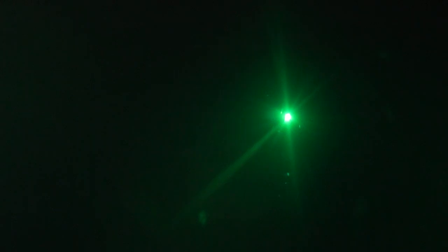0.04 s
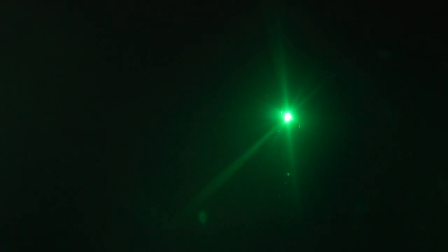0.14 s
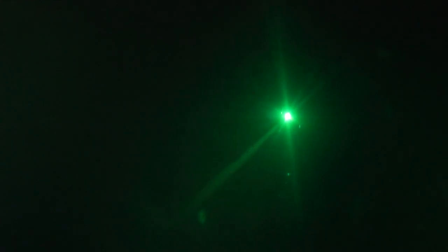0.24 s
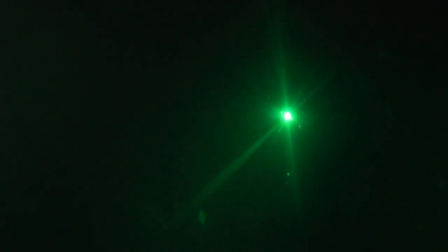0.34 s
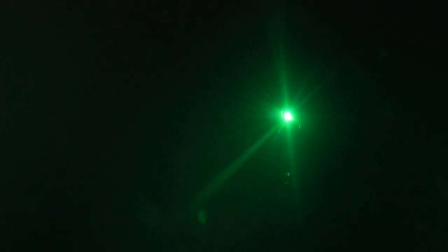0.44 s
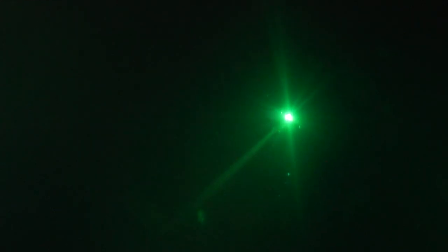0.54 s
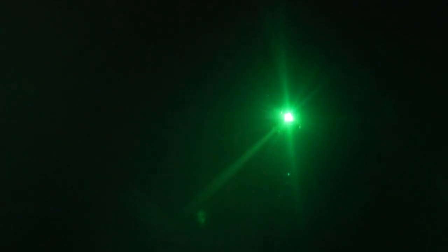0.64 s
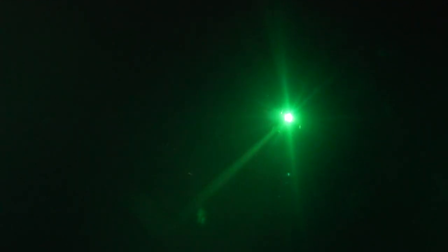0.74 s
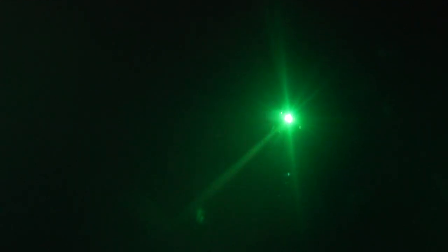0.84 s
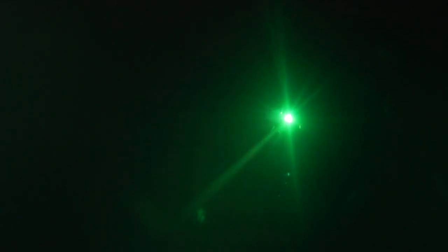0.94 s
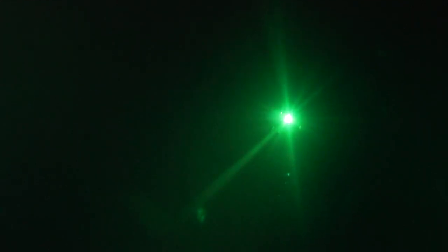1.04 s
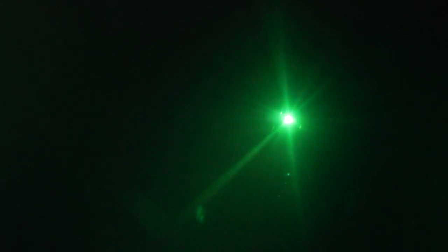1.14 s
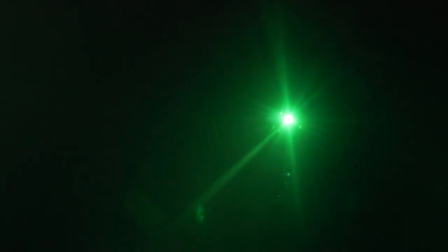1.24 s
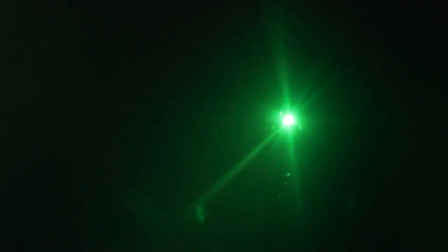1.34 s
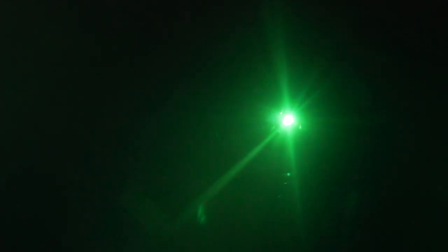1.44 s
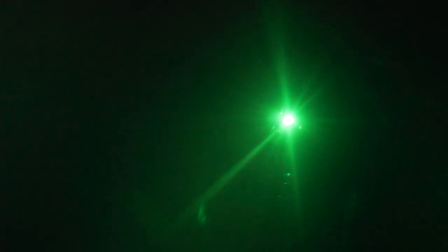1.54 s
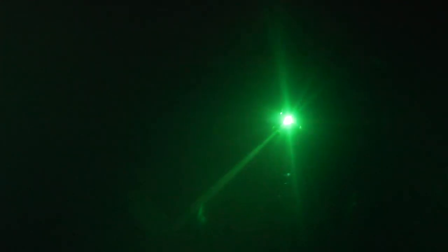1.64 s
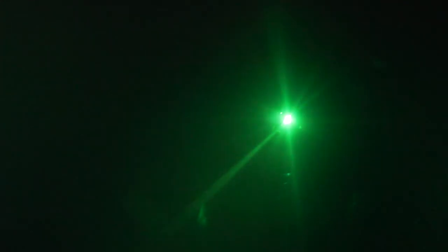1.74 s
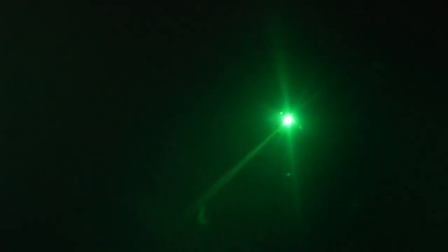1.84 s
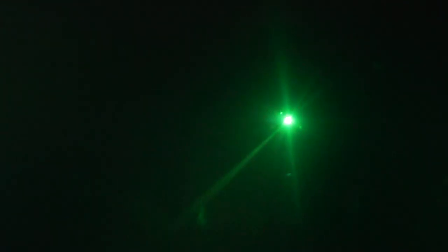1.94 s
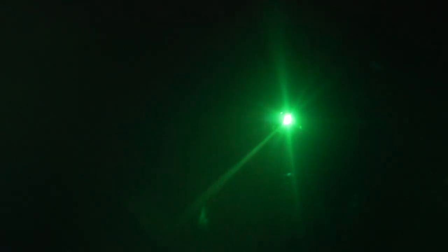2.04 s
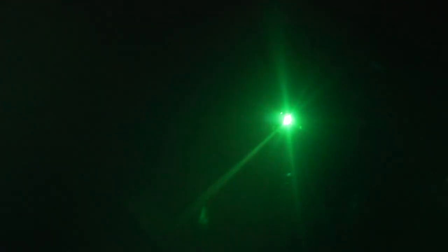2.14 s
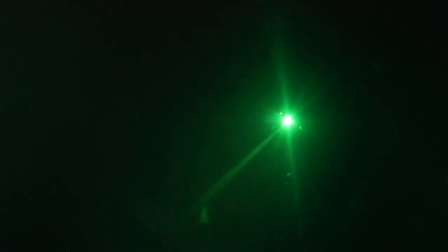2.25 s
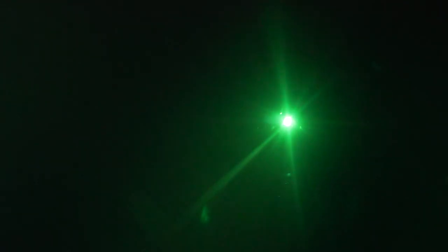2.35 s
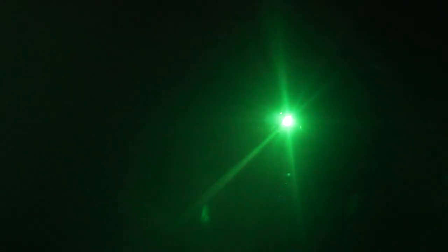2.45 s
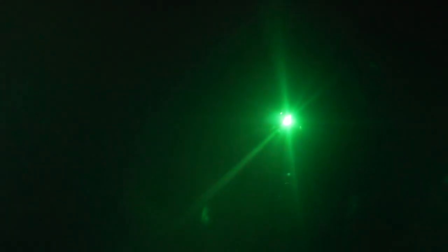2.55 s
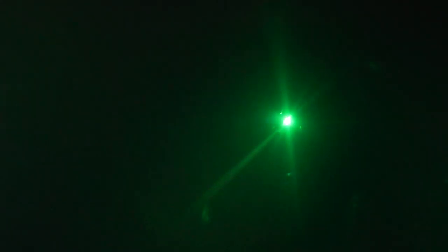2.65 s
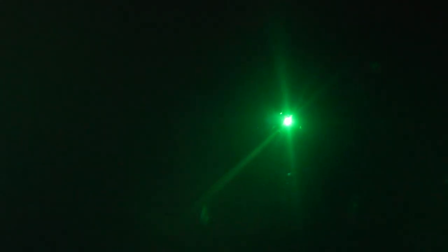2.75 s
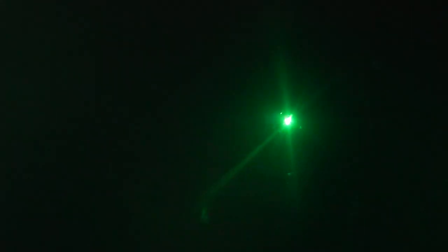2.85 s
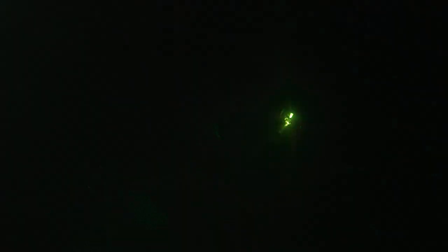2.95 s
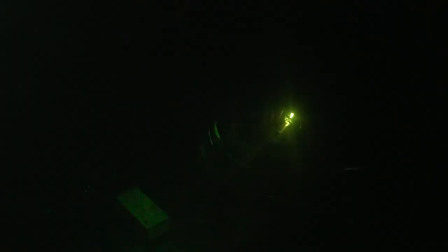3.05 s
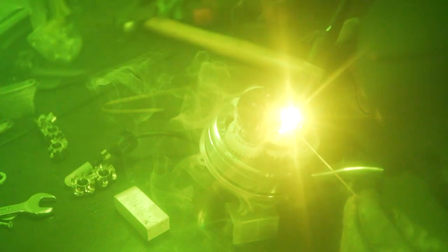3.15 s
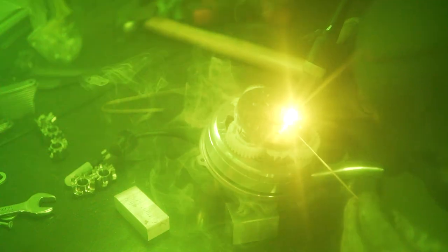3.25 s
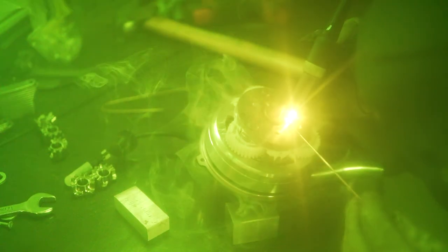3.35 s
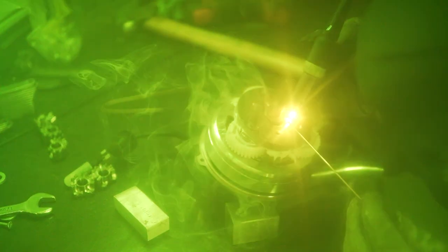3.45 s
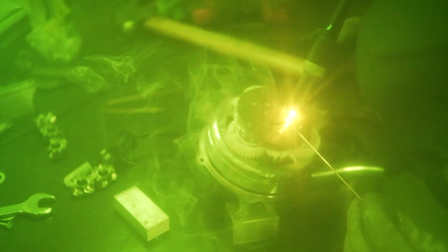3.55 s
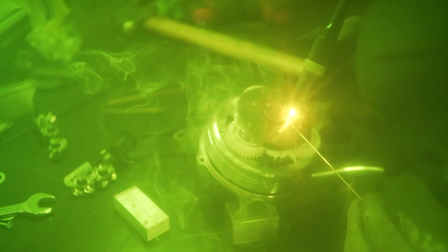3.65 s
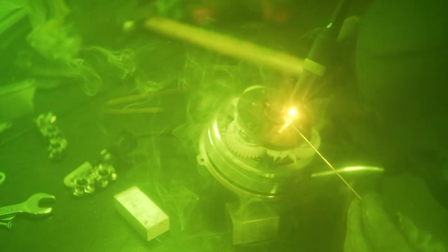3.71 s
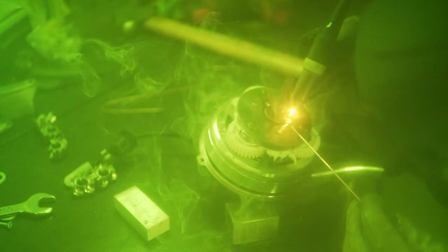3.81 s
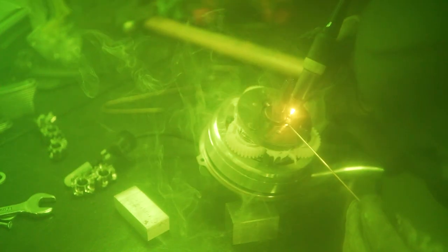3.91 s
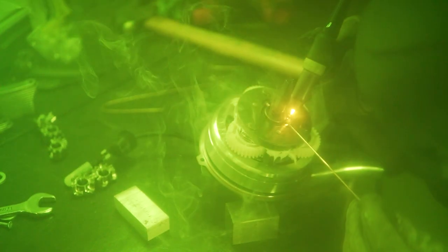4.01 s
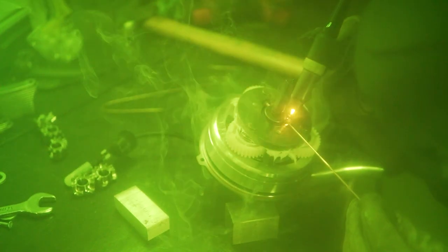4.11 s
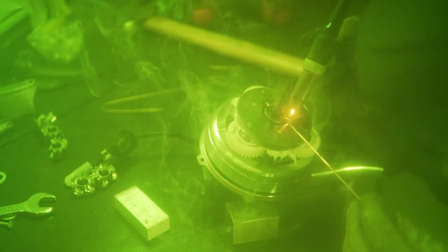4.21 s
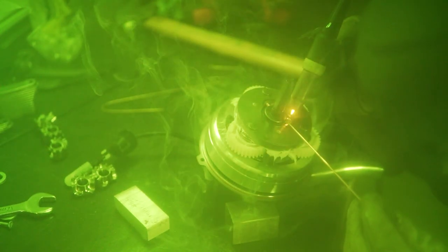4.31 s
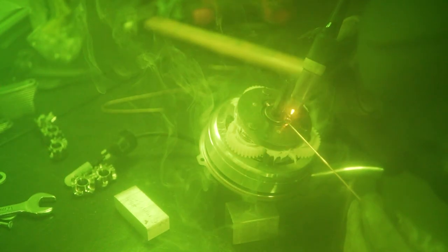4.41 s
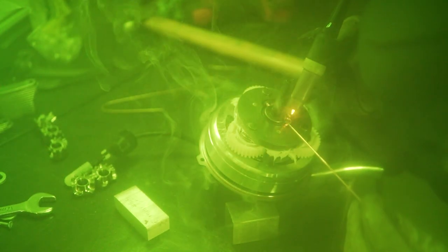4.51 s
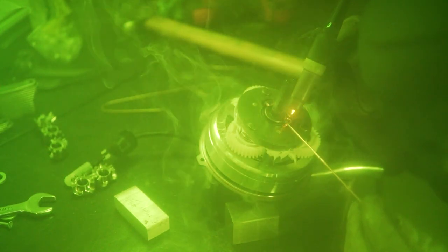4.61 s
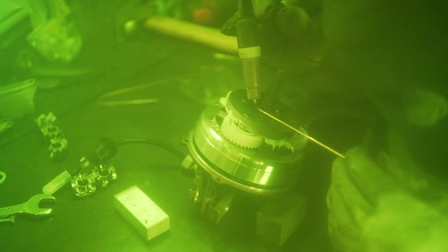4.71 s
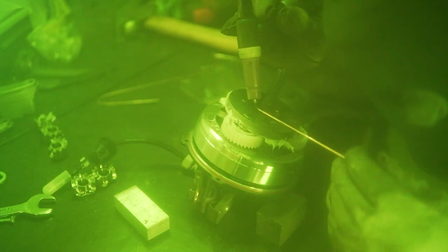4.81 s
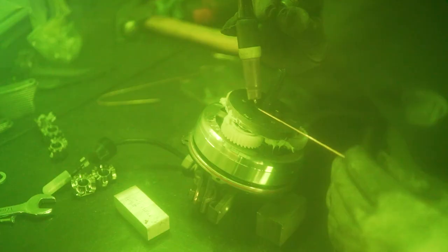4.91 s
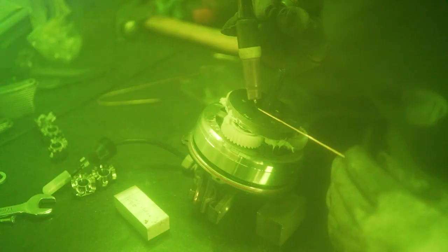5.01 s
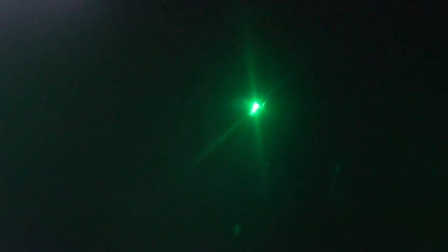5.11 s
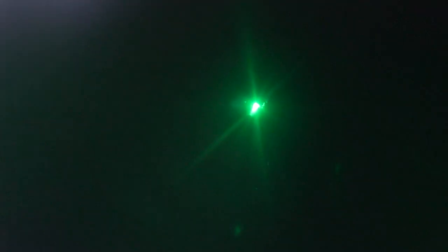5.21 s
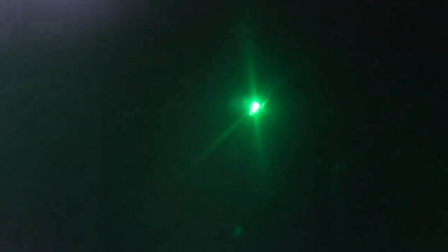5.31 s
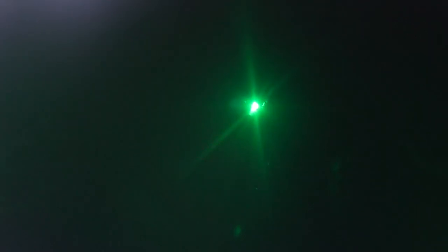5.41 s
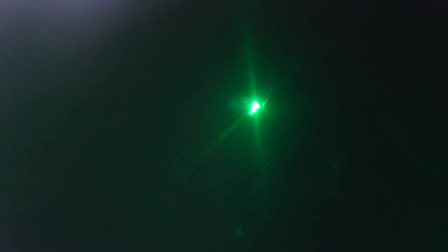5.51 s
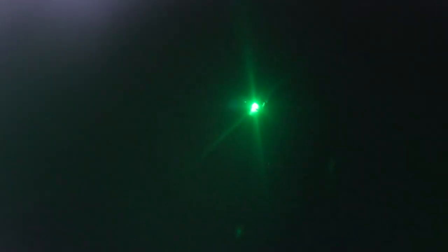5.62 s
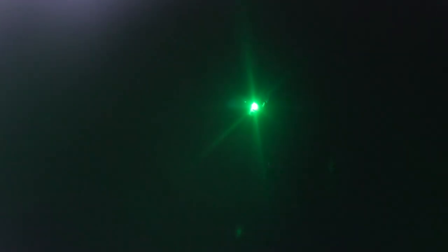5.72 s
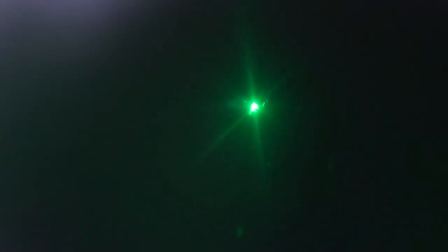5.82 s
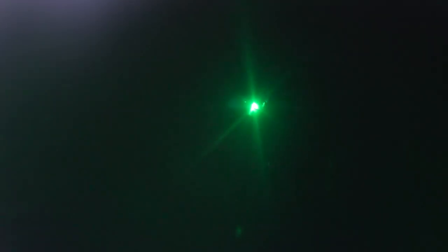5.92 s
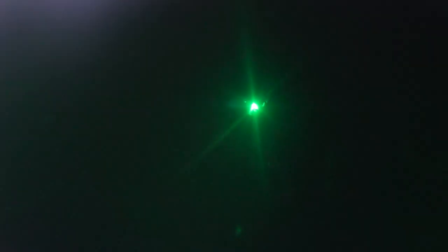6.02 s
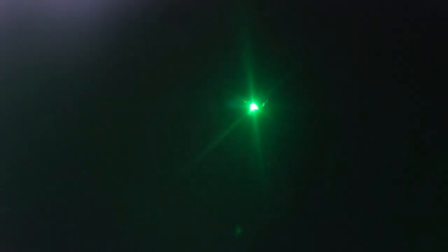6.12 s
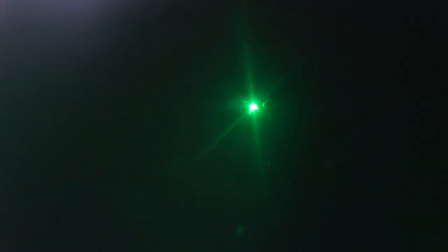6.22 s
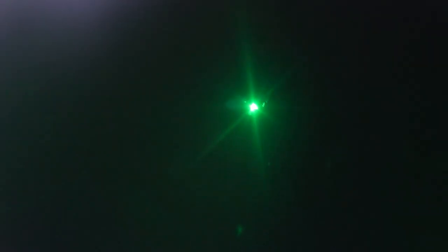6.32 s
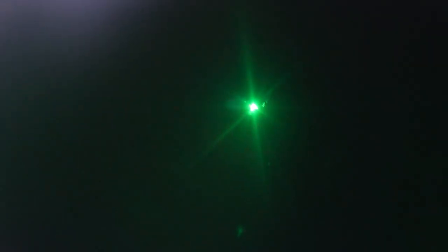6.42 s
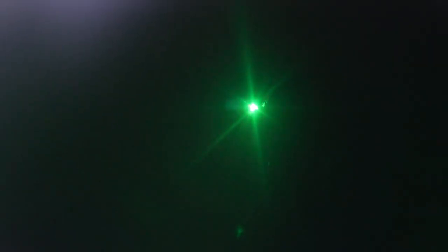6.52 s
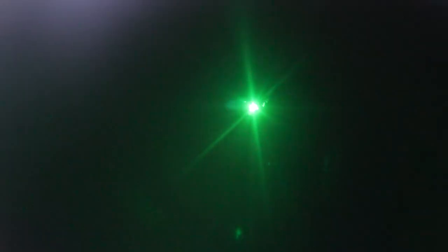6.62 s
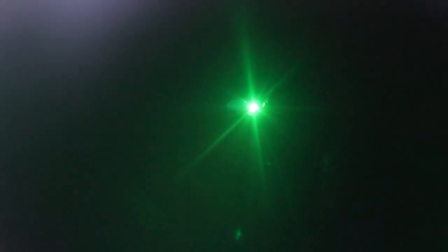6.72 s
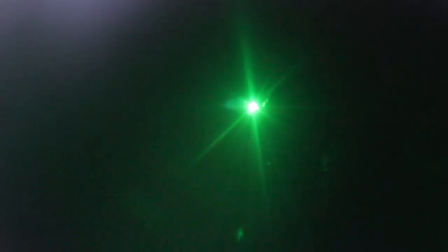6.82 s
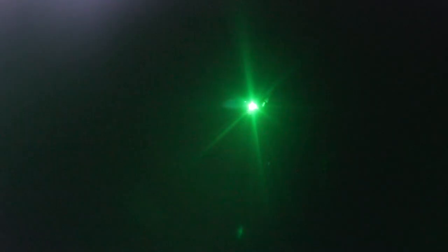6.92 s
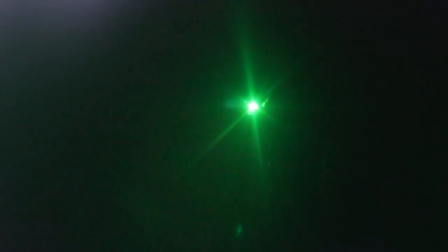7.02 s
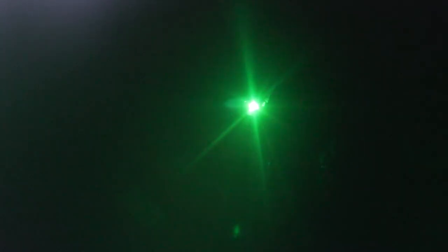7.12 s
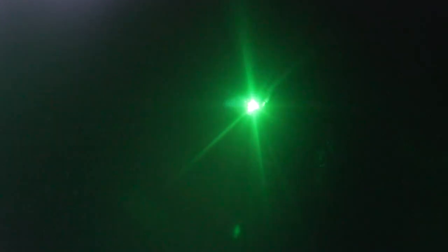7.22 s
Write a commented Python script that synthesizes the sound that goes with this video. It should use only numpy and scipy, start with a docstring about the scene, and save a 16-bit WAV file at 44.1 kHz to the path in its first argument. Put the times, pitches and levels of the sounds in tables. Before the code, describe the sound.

Close arc welding crackles and hisses, stops with a hollow pop, then snaps back on over a quiet machine hum.

```python
"""An AC TIG torch welds a small metal part on a workshop bench, close to a single microphone.
The arc hisses, roars and cracks unevenly as it relights on its 100 Hz current cycle; the first of
two runs ends with a hollow pop. Shielding gas keeps flowing while the torch is reset, with light
knocks and ticks of the filler rod, and a loud spark starts the second run. Behind it all the
machine hums and its cooling fan runs."""
import sys
import numpy as np
from scipy import signal
from scipy.fft import rfft, irfft
from scipy.io import wavfile

SR = 44100
rng = np.random.default_rng(int(sys.argv[2]) if len(sys.argv) > 2 else 0)


def materialize(psi):
    """Save the field psi as 16-bit PCM at rate SR to the path in sys.argv[1].

    A 1-D psi becomes a single channel; in a 2-D psi each row is a channel.
    """
    bounded = np.clip(np.atleast_2d(psi).T, -1, 1)
    quanta = np.round(bounded * 32767).astype(np.int16)
    wavfile.write(sys.argv[1], SR, quanta)


N = 320166
TIME = np.arange(N) / SR
ARC_OUT_S, TORCH_MOVED_S, ARC_ON_S = 2.968, 4.738, 5.125


def arc_cracks(run, start_s, stop_s, relight_s, gain_db, stray_db, spread_db):
    """The arc relights relight_s into each cycle: mostly softly, with stray cracks and loud bursts."""
    # bursts of loud cracks: start_s, length_cycles, cracks_before_one_soft_cycle, relative_db
    bursts = [(.22, 5, 1, -15), (.31, 4, 2, -13), (.43, 2, 2, -15), (.79, 2, 2, -15), (.89, 4, 4, -15),
              (1.09, 5, 1, -15), (1.18, 2, 2, -15), (1.25, 3, 1, -14), (1.32, 2, 2, -15), (1.46, 2, 2, -15),
              (1.51, 2, 2, -13), (1.56, 2, 2, -14), (1.78, 2, 2, -14), (1.84, 5, 2, -14), (1.96, 2, 2, -16),
              (2.03, 1, 1, -15), (2.14, 3, 3, -14.5), (2.19, 5, 1, -14), (2.42, 2, 2, -15),
              (2.59, 2, 2, -13), (2.74, 8, 6, -16), (2.85, 12, 12, -11), (5.22, 3, 3, -14),
              (5.31, 5, 2, -15), (5.43, 5, 2, -15), (5.54, 3, 1, -13), (5.61, 2, 2, -16), (5.74, 9, 7, -13),
              (5.9, 2, 2, -14), (6.0, 5, 2, -14), (6.09, 1, 1, -12), (6.17, 9, 2, -13), (6.28, 2, 2, -12),
              (6.41, 5, 2, -14), (6.49, 11, 6, -13), (6.61, 7, 2, -15), (6.71, 4, 4, -13),
              (6.82, 1, 1, -13), (6.86, 7, 2, -14), (6.95, 3, 1, -12), (7.22, 3, 3, -14)]
    # spectrum of a crack for each torch position: frequency_hz, relative_db
    crack_1 = [(250, -9), (700, -8.5), (1500, -15.5), (2000, -4.5), (2650, -11.5), (3300, 2), (5500, -7),
               (7500, 3), (9000, -6), (11000, -18), (15500, -32)]
    crack_2 = [(250, -17.5), (700, -3), (1500, -26), (3300, -5.5), (5500, -8), (7500, 3), (9000, -15),
               (11000, -24.5), (15500, -51)]
    # its echoes off the gas cup and the part: delay_ms, gain
    echoes_1 = [(.166, .5), (.994, -.37), (1.094, .28)]
    echoes_2 = [(.3, -.9), (.542, .7), (.673, -.8), (.95, .3)]
    spectrum, echoes = (crack_1, echoes_1) if run == 1 else (crack_2, echoes_2)
    cycle_hz, polarity_lag_s, jitter_s = 100, .0003, .0001
    cycle = np.arange(int(TIME[-1] * cycle_hz))
    crack_db = stray_db - spread_db * rng.random(len(cycle))
    scatter_db = 1.03 * rng.standard_normal(len(cycle))
    for burst_s, length, in_a_row, burst_db in bursts:
        step = cycle - round(burst_s * cycle_hz)
        calm = (step >= -1) & (step <= length)   # just before, between and after the loud cracks
        loud = (step >= 0) & (step < length) & (step % (in_a_row + 1) < in_a_row)
        opening_db = 1.0 * (step == 0)   # a burst opens a little harder
        crack_db[calm] = stray_db - spread_db / 2
        crack_db[loud] = (burst_db + scatter_db + opening_db)[loud]
    at_s = cycle / cycle_hz + relight_s + polarity_lag_s * (cycle % 2)
    at_s += jitter_s * rng.standard_normal(len(cycle))
    lit = (at_s > start_s) & (at_s < stop_s)
    clicks = np.zeros(N)
    clicks[(at_s[lit] * SR).astype(int)] = from_db(crack_db[lit])
    # each spark sputters for about a millisecond
    sputter = .04 * np.convolve(clicks, np.ones(SR // 900))[:N] * rng.standard_normal(N)
    spark = smear(colour(sputter - clicks, spectrum), lag_ms=.3, feedback=.55)
    reflected = sum(gain * np.roll(spark, round(ms * SR / 1000)) for ms, gain in echoes)
    return from_db(gain_db) * (spark + reflected)


def arc_burn(run, hiss_db, sing_db, roar_db, flutter_db):
    """The hot gas hisses, sings in narrow resonances and roars low; all of it flutters with the arc."""
    # strength of the arc through each run: time_s, hiss_relative_db, roar_relative_db
    curve_1 = [(0.0, -31.5, -37.5), (2.86, -30.5, -35), (2.93, -28, -27)]
    curve_2 = [(5.2, -28, -29.5), (5.35, -31.5, -36), (7.26, -30, -37)]
    # hiss of the burning arc in each run: frequency_hz, relative_db
    hiss_1 = [(700, -32), (1420, -10), (2330, -13), (3360, -0.5), (3880, -9.5), (4290, 4.5), (4740, -36),
              (5430, -0.5), (6070, -8), (7360, 4), (9560, -14), (11240, -27), (11600, -18), (15460, -40)]
    hiss_2 = [(700, -28), (1420, -20), (2450, -17), (2710, 1.5), (3230, -6), (3750, 4), (4650, -36),
              (5430, 5.5), (6070, -1), (7880, 4.5), (8660, -0.5), (13950, -34), (14470, -48), (15460, -63)]
    # resonances that sing in the hiss: pitch_hz, width_hz, relative_db
    sing_1 = [(3280, 220, -4.5), (5310, 190, -1), (6300, 140, -2), (7350, 62, 4), (7720, 48, 2),
              (8400, 80, -3), (9120, 80, -10), (9830, 120, -13), (11600, 180, -17), (12700, 80, -24)]
    sing_2 = [(2045, 96, -1.5), (4190, 140, 4.5), (5720, 440, 1.5), (6800, 83, 6), (7370, 30, -2),
              (7820, 69, 6)]
    # low roar of the arc: frequency_hz, relative_db
    roar_spectrum = [(60, -34), (170, -12), (270, 2.5), (370, 2), (520, -5.5), (700, -8), (1100, -7.5),
                     (1500, -16), (2500, -32.5)]
    curve, spectrum, resonances = (curve_1, hiss_1, sing_1) if run == 1 else (curve_2, hiss_2, sing_2)
    hiss_curve_db, roar_curve_db = in_time(curve)
    hiss = from_db(hiss_db) * noise(spectrum) + from_db(sing_db) * sing(resonances)
    roar = from_db(roar_curve_db + roar_db) * noise(roar_spectrum)
    return (from_db(hiss_curve_db) * hiss + roar) * from_db(flutter_db * drift(150))


def arc_whistle(pitch_hz, level_db, wander_hz, waver_db):
    """A thin tone of the burning arc, unsteady in pitch and strength."""
    phase = 2 * np.pi * np.cumsum(pitch_hz + wander_hz * drift(90)) / SR
    return from_db(level_db + waver_db * drift(7)) * np.sqrt(2) * np.sin(phase)


def spark_pops():
    """Each pop is a shower of sparks that dies away; the longer ones sizzle."""
    # the starting spark and stray pops of the melt: start_s, level_db, t60_s
    showers = [(1.0198, -20, .006), (1.178, -28, .08), (1.238, -26, .09), (1.275, -28, .08),
               (1.333, -28, .09), (2.9502, -16, .004), (2.956, -23, .05), (2.9903, -20, .01),
               (5.1248, 3.5, .018), (5.128, -25, .38), (5.167, -17, .01), (5.204, -14, .006),
               (5.226, -25, .06), (5.256, -6, .009), (5.277, -22, .02)]
    # spectrum of a pop: frequency_hz, relative_db
    spectrum = [(90, -16), (190, 1), (480, -6), (800, -3), (1500, -12), (2000, 0), (2500, -5), (6000, 1),
                (10000, -2), (12000, -9), (16000, -20)]
    envelope = sum(from_db(db) * dying(start_s, t60_s) for start_s, db, t60_s in showers)
    return colour(envelope * rng.standard_normal(N), spectrum)


def bench_knocks(swell_s):
    """A soft contact swells into one hollow, quickly damped tone."""
    # dull knocks on the bench: start_s, relative_db, pitch_hz, t60_s
    knocks = [(2.9555, -7.5, 669, 0.074), (2.9785, -11.5, 633, 0.078), (2.9890, -9.5, 300, 0.025),
              (3.6670, -21.5, 357, 0.063), (4.7380, -27, 644, 0.079)]
    out = np.zeros(N)
    for start_s, db, pitch_hz, t60_s in knocks:
        envelope = from_db(db) * after(start_s, swell_s) * dying(start_s, t60_s)
        out += envelope * np.sin(2 * np.pi * pitch_hz * (TIME - start_s))
    return out


def rod_ticks():
    """The filler rod grazes the metal: a short bright scratch or clink."""
    # light touches of the rod: start_s, level_db, pitch_hz, width_hz, t60_s
    touches = [(3.178, -29, 7500, 3000, 0.023), (3.8035, -32, 4500, 2000, 0.022),
               (4.9789, -25.5, 4600, 700, 0.038)]
    white = rng.standard_normal(N)
    out = np.zeros(N)
    for start_s, db, pitch_hz, width_hz, t60_s in touches:
        band = resonate(resonate(white, pitch_hz, width_hz), pitch_hz, width_hz)
        out += from_db(db) * dying(start_s, t60_s) * rms_one(band)
    return out


def shielding_gas(first_db, sing_db, second_db):
    """The gas jet hisses on its own and changes colour when the torch is moved."""
    # the jet at each torch position: frequency_hz, relative_db
    jet_1 = [(700, -10.5), (1420, -7.5), (2450, -13), (3230, 1), (3880, -9), (4130, 3), (5040, -13),
             (5300, -3.5), (5680, -18), (6200, -2.5), (8660, -8), (9560, -11.5), (10340, -21), (15460, -61)]
    jet_2 = [(700, -24), (1420, -15.5), (2450, -18.5), (2710, -9.5), (4780, -16), (5170, -6), (6460, -19),
             (8010, -1.5), (8910, -16.5), (10340, -25), (11890, -31), (12400, -29), (13180, -39),
             (15460, -40)]
    # resonances in the jet before the move: pitch_hz, width_hz, relative_db
    resonances = [(1890, 150, -4), (3320, 170, -2), (4280, 150, -1), (6250, 160, -2.5), (7000, 130, -10),
                  (7360, 110, -1), (8180, 98, -5)]
    moved = after(TORCH_MOVED_S, 0.012)
    first = from_db(first_db) * noise(jet_1) + from_db(sing_db) * sing(resonances)
    second = from_db(second_db) * noise(jet_2)
    return (1 - moved) * first + moved * second


def machine(load, fan_db, waver_db, waver_turns):
    """Fan rush and hum of the welder; the mains harmonics swell while current is drawn."""
    # rush of the cooling fan: frequency_hz, relative_db
    fan_spectrum = [(20, -34), (40, -11), (57, 0), (72, -9.5), (100, 7.5), (140, -3.5), (200, -3.5),
                    (340, 0), (480, -5), (680, -2.5), (850, -10.5), (1020, -14), (1180, -2.5),
                    (1600, -31.5)]
    # steady tones of the machine: pitch_hz, idle_db, load_db
    hum_tones = [(108.4, -57, -54), (120, -72, -55.5), (176.3, -56, -59), (239.5, -50.5, -44),
                 (358.3, -55, -47), (597.5, -86, -52), (680.6, -54.5, -52), (940, -79, -59),
                 (1164, -74, -59.5), (1184, -60.5, -60.5)]
    out = from_db(fan_db) * noise(fan_spectrum)
    for pitch_hz, idle_db, load_db in hum_tones:
        turns = pitch_hz * TIME + rng.random() + waver_turns * drift(5)
        level_db = idle_db + load * (load_db - idle_db) + waver_db * drift(8)
        out += from_db(level_db) * np.sqrt(2) * np.sin(2 * np.pi * turns)
    return out


def workshop(x, bench_db, bench_s, room_db, treble_t60_s):
    """Direct sound, quick reflections off the bench, then a room tail that is shorter in the treble."""
    room_t60_s, treble_hz = .38, 7000
    t = TIME[:SR // 2]
    white = rng.standard_normal((2, len(t))) * (t > .0025)   # reflections arrive after 2.5 ms
    low = signal.sosfilt(signal.butter(2, treble_hz, fs=SR, output="sos"), white[0])
    high = signal.sosfilt(signal.butter(2, treble_hz, "high", fs=SR, output="sos"), white[1])
    tail = low * from_db(-60 * t / room_t60_s) + high * from_db(-60 * t / treble_t60_s)
    bench = white[1] * np.exp(-t / bench_s)
    response = from_db(room_db) * tail / np.linalg.norm(tail)
    response += from_db(bench_db) * bench / np.linalg.norm(bench)
    return x + signal.fftconvolve(x, response)[:N]


def from_db(db):
    """Decibels to gain."""
    return 10 ** (np.asarray(db) / 20)


def rms_one(x):
    """Scale to an rms of 1."""
    return x / np.sqrt(np.mean(x ** 2) + 1e-20)


def in_time(rows):
    """Each column of a curve at every sample."""
    time_s, *columns = np.transpose(rows)
    return [np.interp(TIME, time_s, column) for column in columns]


def after(start_s, fade_s):
    """A ramp from 0 to 1."""
    return np.clip((TIME - start_s) / fade_s, 0, 1)


def dying(start_s, t60_s):
    """An envelope that jumps to 1 and dies away."""
    out = np.zeros(N)
    span = slice(int(start_s * SR), int((start_s + 2 * t60_s) * SR))
    out[span] = from_db(-60 * (TIME[span] - start_s) / t60_s)
    return out


def drift(rate_hz):
    """A random wander through rate_hz new values a second, rms 1."""
    knots = rng.standard_normal(4096)
    return rms_one(np.interp(TIME * rate_hz, np.arange(len(knots)), knots))


def colour(x, spectrum, size=8192):
    """A causal (minimum-phase) filter of unit energy with the given spectrum."""
    hz, db = np.transpose(spectrum)
    grid_hz = np.maximum(np.fft.rfftfreq(size, 1 / SR), 1)
    bass_rolloff_db = 40 * np.log10(np.minimum(grid_hz / hz[0], 1))
    shape_db = np.interp(np.log(grid_hz), np.log(hz), db) + bass_rolloff_db
    cepstrum = irfft(np.log(from_db(shape_db)))
    kernel = irfft(np.exp(rfft(2 * cepstrum[:size // 2], size)))
    return signal.fftconvolve(x, kernel / np.linalg.norm(kernel))[:N]


def noise(spectrum):
    """Coloured noise, rms 1."""
    return colour(rng.standard_normal(N), spectrum)


def resonate(x, pitch_hz, width_hz):
    """A resonance with a peak gain of 1."""
    radius = np.exp(-np.pi * width_hz / SR)
    feedback = [1, -2 * radius * np.cos(2 * np.pi * pitch_hz / SR), radius ** 2]
    return signal.lfilter(np.array([1, 0, -1]) * (1 - radius ** 2) / 2, feedback, x)


def sing(resonances):
    """Noise ringing in a set of narrow resonances, rms 1."""
    white = rng.standard_normal(N)
    return rms_one(sum(from_db(db) * resonate(white, hz, width_hz) for hz, width_hz, db in resonances))


def smear(x, lag_ms, feedback):
    """A short all-pass echo: it spreads a click without changing its colour."""
    gap = np.zeros(int(lag_ms * SR / 1000))
    return signal.lfilter(np.r_[-feedback, gap, 1], np.r_[1, gap, -feedback], x)


def scene():
    """Two runs of the arc heard in mono at the bench, with gas between them and the machine behind."""
    first, second = 1 - after(ARC_OUT_S, 0.017), after(ARC_ON_S, 0.0045)
    load = first + second
    cracks = arc_cracks(1, 0, ARC_OUT_S, relight_s=.0004, gain_db=12, stray_db=-18.5, spread_db=20)
    cracks += arc_cracks(2, 5.2, TIME[-1], relight_s=.0041, gain_db=11, stray_db=-14.5, spread_db=29)
    burn = first * arc_burn(1, hiss_db=-5.5, sing_db=-9, roar_db=-4, flutter_db=2.74)
    burn += second * arc_burn(2, hiss_db=-6, sing_db=-7, roar_db=-3, flutter_db=3)
    jet = (1 - load) * shielding_gas(first_db=-41, sing_db=-46.5, second_db=-37.5)
    direct = cracks + burn + jet + rod_ticks()
    torch = workshop(direct, bench_db=-9, bench_s=.0043, room_db=-10.5, treble_t60_s=.12)
    tones = first * arc_whistle(4230, level_db=-41.5, wander_hz=11, waver_db=.5)
    tones += second * arc_whistle(3793, level_db=-44.5, wander_hz=8, waver_db=1.5)
    whine_hz = 14200 + 80 * drift(3)
    tones += load * arc_whistle(whine_hz, level_db=-66, wander_hz=25, waver_db=4)
    pops = workshop(spark_pops(), bench_db=-16, bench_s=.008, room_db=-7.5, treble_t60_s=.25)
    knocks = bench_knocks(swell_s=.003)
    knocks = workshop(knocks, bench_db=-30, bench_s=.006, room_db=-10, treble_t60_s=.25)
    hum = machine(load, fan_db=-41.5, waver_db=0.9, waver_turns=0.042)
    return (torch + tones + pops + knocks + hum)[None]


def record(dry):
    """The loudest spark overloads the recorder; the top is cut."""
    cutoff_hz = 15800
    lowpass = signal.ellip(10, .1, 80, cutoff_hz, fs=SR, output="sos")
    return signal.sosfilt(lowpass, np.clip(dry, -.9, .9))


dry = scene()
out = record(dry)
materialize(out)
```